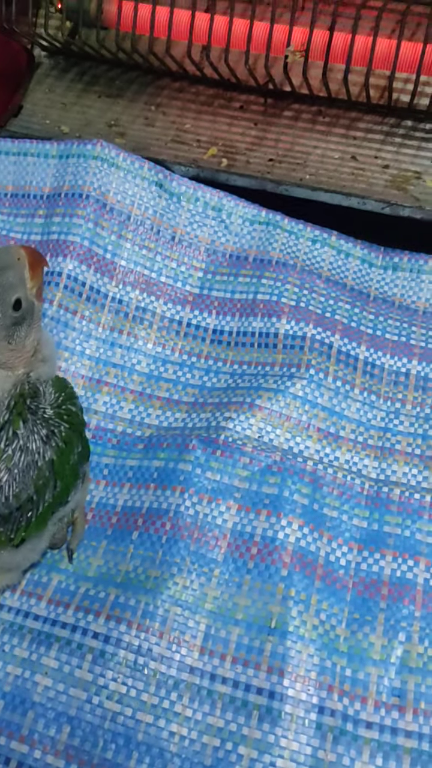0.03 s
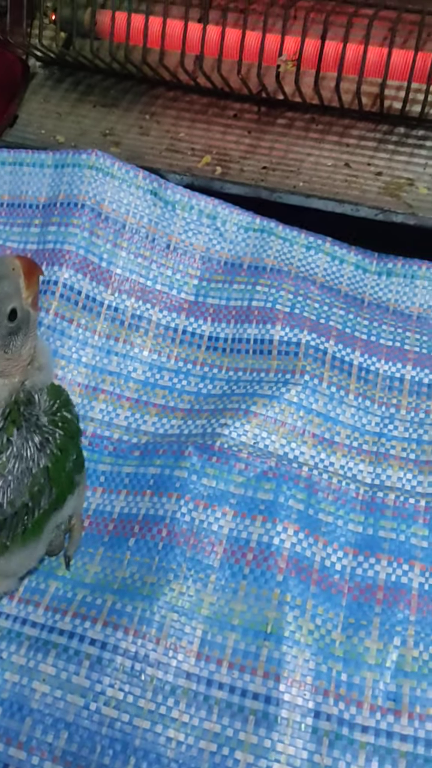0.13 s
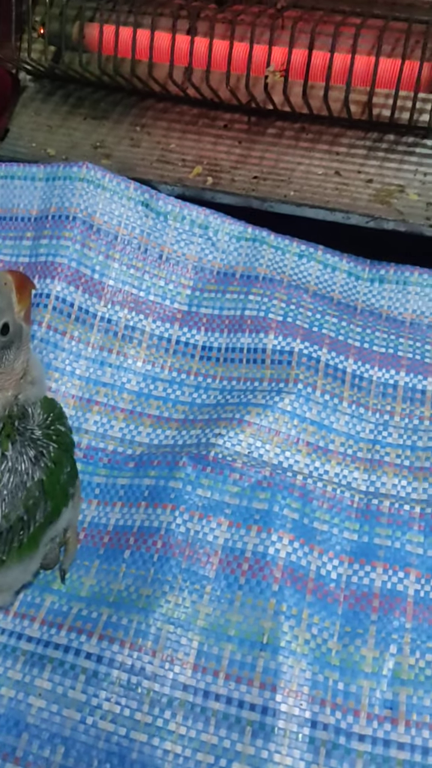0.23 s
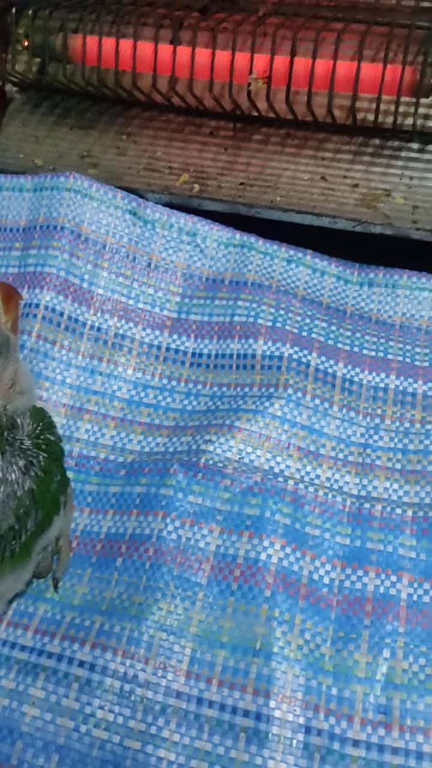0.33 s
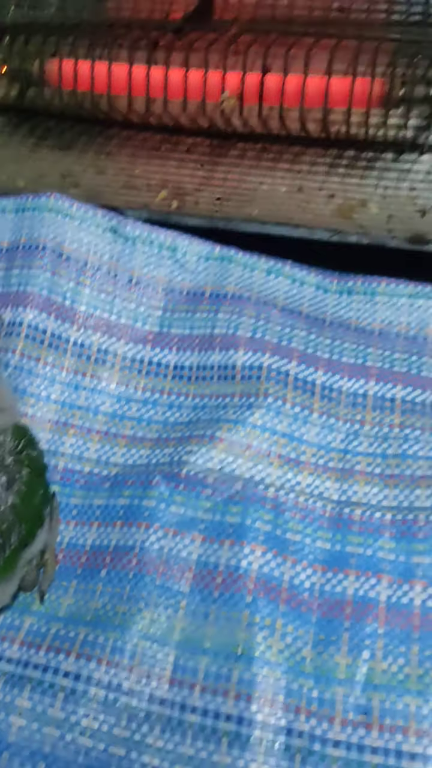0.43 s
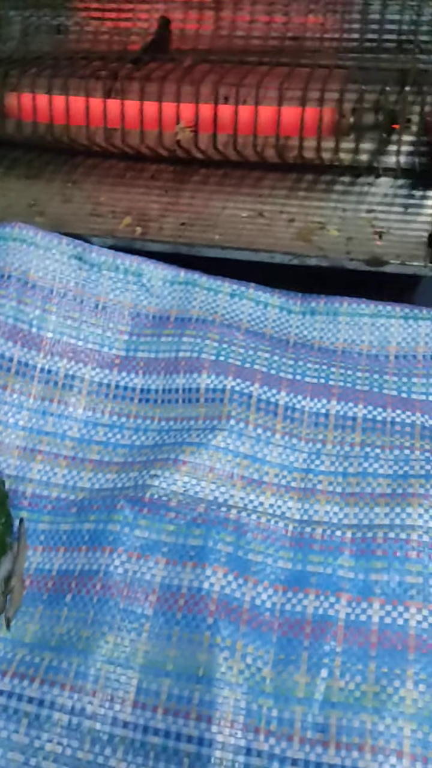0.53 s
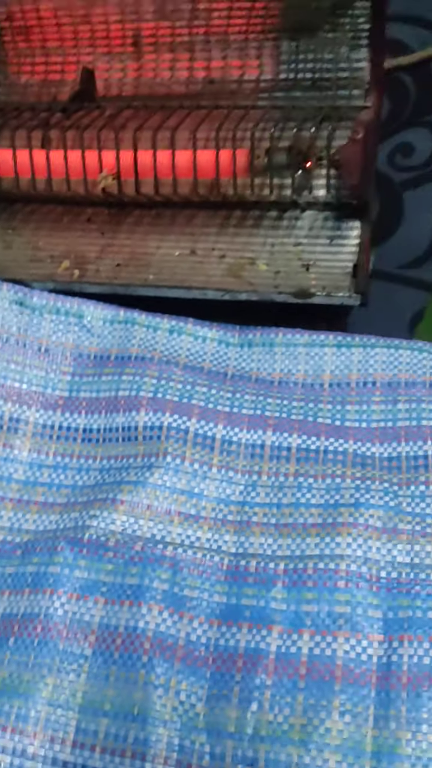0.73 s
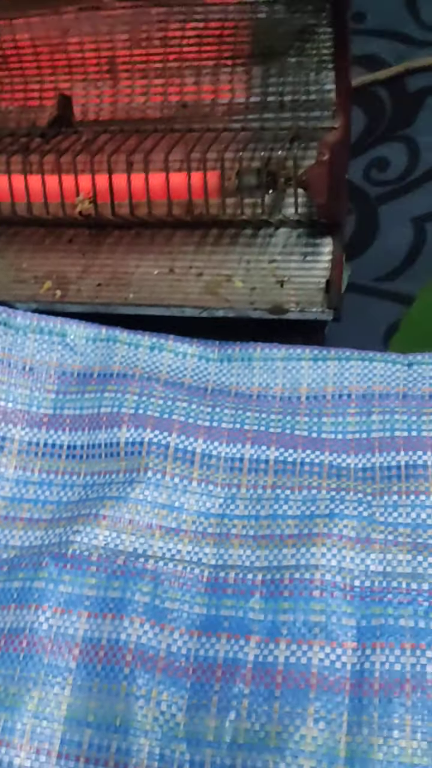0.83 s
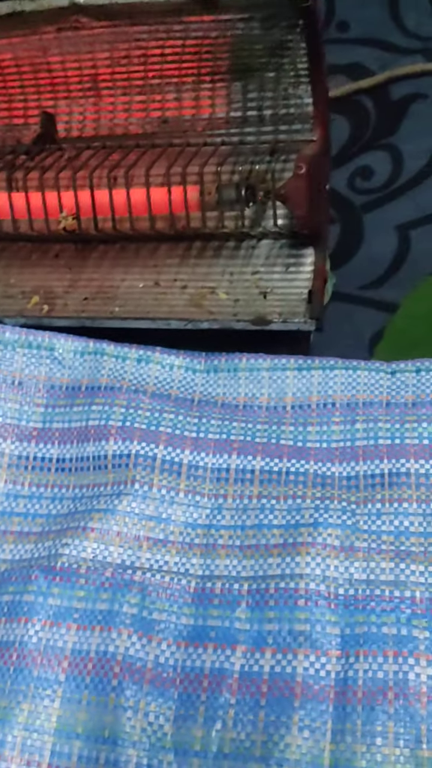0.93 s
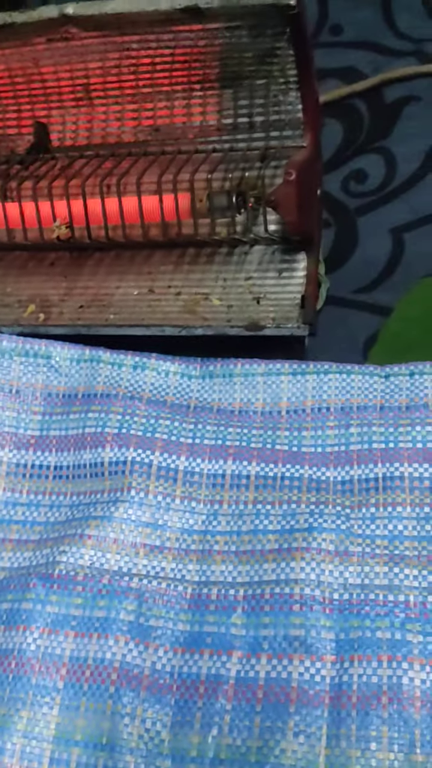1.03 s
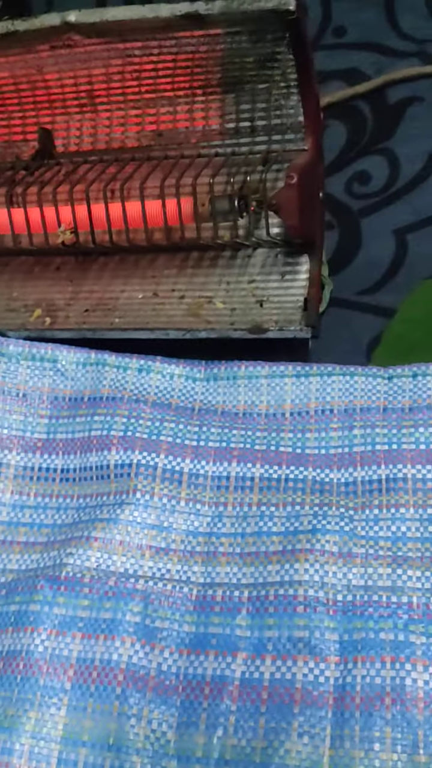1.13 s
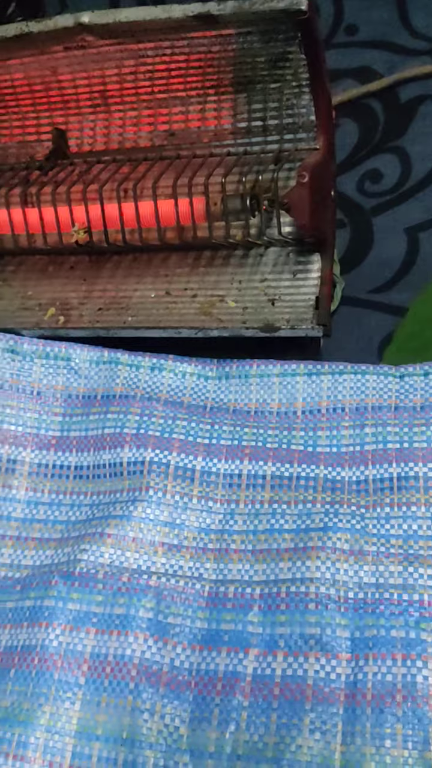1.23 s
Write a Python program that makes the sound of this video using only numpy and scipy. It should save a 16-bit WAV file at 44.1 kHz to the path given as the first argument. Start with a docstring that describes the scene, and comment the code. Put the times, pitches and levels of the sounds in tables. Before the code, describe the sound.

Single raspy parrot chick squawk, wheezing in and sinking to a buzzy end, then soft hiss.

```python
"""Parrot begging call

A young parrot begs once, close by in a small room. A squeak, then a wheeze with a faint beak click in
it just before the voice; a high nasal tone breaks into a long sinking rasp, rattles, and closes on a
loud buzzy note. Voice: jittered pulses through moving resonances, over a sine fundamental. Squeak:
gliding partials. Wheeze, click, hiss, rumble: coloured noise. After the call the hiss dips and swells."""
import sys
import numpy as np
from scipy import signal
from scipy.fft import rfft, irfft, next_fast_len
from scipy.io import wavfile
from scipy.ndimage import uniform_filter1d

SR = 44100
rng = np.random.default_rng(int(sys.argv[2]) if len(sys.argv) > 2 else 0)


def output_pcm(signal):
    """Save a mono or channel-first signal as 16-bit PCM at the path in sys.argv[1].

    Samples are clipped to [-1, 1] before scaling.
    """
    pcm = np.clip(np.atleast_2d(signal).T, -1, 1) * 32767
    wavfile.write(sys.argv[1], SR, np.round(pcm).astype(np.int16))


N = 57330
T = np.arange(N) / SR

# voice pitch: t/s, f/Hz
PITCH_HZ = [(.17, 1180), (.21, 1215), (.222, 1258), (.241, 1300), (.259, 1252), (.268, 1262), (.28, 1296),
            (.297, 1175), (.318, 1168), (.332, 970), (.352, 1015), (.39, 900), (.47, 900), (.53, 790),
            (.66, 750), (.735, 680), (.746, 650), (.764, 633), (.773, 638), (.781, 627), (.794, 595),
            (.803, 555), (.815, 500)]
# vocal effort: t/s, level/dB
EFFORT_DB = [(.14, -127), (.175, -35.5), (.205, -28), (.228, -21), (.27, -23.5), (.32, -21), (.37, -23.5),
             (.44, -21.5), (.53, -25.5), (.6, -23), (.67, -24), (.705, -21), (.736, -21), (.748, -18),
             (.785, -17.5), (.802, -21), (.812, -29.5), (.82, -52)]
# voice state: t/s, jitter/cycles, strong-weak depth/0-1, rattle depth/0-1
VOICE_STATE = [(.17, .2, .2, .1), (.205, .045, .4, .4), (.235, .012, .6, .5), (.28, .012, .6, .3),
               (.312, .038, .5, .35), (.345, .11, .3, .4), (.5, .17, .3, .52), (.66, .12, .3, .5),
               (.695, .12, .3, .85), (.735, .07, .4, .75), (.747, .01, .35, .25), (.775, .003, .2, .08),
               (.803, .003, .16, .06), (.815, .02, .2, .1)]
# fundamental relative to the pulsed voice: t/s, level/dB
FUNDAMENTAL_DB = [(.17, -17), (.215, -16), (.25, -15.5), (.32, -15), (.355, -15.5), (.4, -22), (.55, -23),
                  (.62, -17), (.72, -24), (.755, -17), (.79, -17), (.812, -12)]
# undertones, relative to the fundamental at full strong-weak depth: multiple of pitch/1, level/dB
UNDERTONE_PARTIALS = [(.5, -9), (.79, -7)]
# gain on all undertones: t/s, level/dB
UNDERTONE_GAIN_DB = [(.215, -24), (.24, 0), (.28, 0), (.3, -14), (.33, -60)]
# fixed colour of throat and beak: f/Hz, level/dB
THROAT_COLOUR = [(200, -30), (400, -17), (560, -9), (750, -7), (1100, -6), (1550, -5), (2000, -1.5),
                 (2400, 1), (3600, -2), (4300, -3), (5400, -3), (6400, -6), (7400, -5), (9500, -8),
                 (10600, -13), (11500, -24), (13500, -24), (15500, -44)]
# all-pass smear of each pulse in the airway: f/Hz, width/Hz
AIRWAY_SMEAR = [(2700, 2300), (3800, 220), (5600, 520), (7800, 5600), (8900, 1900)]
# moving throat resonances: t/s, lower f/Hz, lower level/dB, upper f/Hz, upper level/dB
THROAT_RESONANCES = [(.18, 2770, -9, 8700, 4), (.22, 3700, 8, 8880, 26), (.26, 3830, 14, 8980, 19),
                     (.3, 3530, 4, 9300, 9), (.37, 3600, 6, 9050, 11), (.44, 3620, 6, 8850, 14),
                     (.52, 3520, 2, 8600, 1.5), (.6, 3570, 1, 8000, 5), (.72, 3580, -2, 8400, 5),
                     (.755, 3500, -5, 8250, 13), (.78, 3500, -7, 8300, 16.5), (.805, 2400, -6, 8200, 13)]
# width of the upper resonance: t/s, width/Hz
UPPER_WIDTH_HZ = [(.27, 380), (.34, 750), (.7, 850), (.8, 800)]
# extra resonance of the closing note: t/s, level/dB
CLOSING_DB = [(.68, -25), (.74, -4), (.8, -2)]
# fixed notches: f/Hz, width/Hz, depth/0-1
FIXED_NOTCHES = [(4310, 1200, 0.38), (6400, 1130, 0.49)]
# throat hollow, depth per pass: t/s, depth/0-1
HOLLOW_DEPTH = [(.4, 0), (.55, 0), (.66, 0.55), (.72, 0.66), (.8, 0.39)]
# wheeze: t/s, level/dB
WHEEZE_DB = [(.04, -100), (.05, -58), (.062, -49), (.07, -44), (.086, -43), (.092, -38.5), (.14, -38.5),
             (.18, -38), (.23, -39), (.26, -80)]
# wheeze colour: f/Hz, left level/dB, right level/dB
WHEEZE_SPECTRUM = [(156, -25, -31), (690, -14.5, -12.5), (1186, -9.5, -21.5), (1224, -25, -19.5),
                   (1680, -8, -9.5), (2130, -15.5, -5), (2584, -1.5, -11), (3480, -23, -17.5),
                   (4130, -16, -21), (4250, -26, -14.5), (5360, -33, -19), (6330, -22, -8),
                   (7140, -28, -33), (8230, -22.5, -26), (10300, -53, -52), (14000, -94, -55)]
# squeak: t/s, f/Hz, level/dB
SQUEAK_GLIDE = [(.041, 2420, -62), (.044, 2240, -44), (.053, 2050, -42), (.059, 2020, -58)]
# squeak harmonics from the first up: level/dB
SQUEAK_HARMONICS_DB = [0, -15, -18, -27]
# colour of the room tail: f/Hz, level/dB
ROOM_SPECTRUM = [(300, -1), (2500, 0), (6000, -1), (9000, -4), (14000, -12)]
# extra room gain on the right: f/Hz, level/dB
RIGHT_ROOM_GAIN = [(300, 9), (2500, 12), (5000, 11), (7000, 11), (9000, 22), (14000, 20)]
# right side relative to left: f/Hz, level/dB
RIGHT_COLOUR = [(400, -7.5), (1500, -4.5), (3000, -9.5), (3700, -6.5), (4600, 2), (5600, 3.5), (6700, 3.5),
                (7400, 2), (8300, -35.5), (10000, -22.5), (14000, -17.5)]
# room hiss: t/s, level/dB
HISS_DB = [(0, -68), (.04, -68), (.15, -50), (.86, -53), (.93, -55.5), (1.02, -52), (1.11, -50), (1.3, -50)]
# gain on the hiss treble: t/s, level/dB
HISS_TREBLE_DB = [(0, -12), (.15, -35), (.88, -2.5), (1.0, -1.5), (1.15, 2.5), (1.3, 0.5)]
# hiss colour: f/Hz, left level/dB, right level/dB
HISS_SPECTRUM = [(103, -6, -16), (352, 9.5, 6), (810, 3.5, -1.5), (2260, 11.5, 7), (3400, 1.5, -1),
                 (4530, 2.5, 1), (5530, 0.5, 1), (6800, 5, 5.5), (9030, 9.5, -10), (10630, -8, -67),
                 (14600, -16.5, -98)]
# rumble: t/s, level/dB
RUMBLE_DB = [(0, -55.5), (.3, -53.5), (.7, -56), (1.0, -56), (1.2, -55.5), (1.3, -52.5)]
# rumble colour: f/Hz, left level/dB, right level/dB
RUMBLE_SPECTRUM = [(12.1, 2.5, 6), (27.7, 2, -14), (59, -3.5, -20), (104, -16, -16), (164, -8, -12.5),
                   (384, -14, -23.5), (785, -43, -44.5)]

PULSE_SPREAD_DB, AIR_PER_JITTER, AIR_SHARE = 20, 3, .09  # first two per cycle of jitter
STRONG_WEAK_SHARE, LIMP_CYCLES = .45, .06  # at full strong-weak depth
RATTLE_HZ, RATTLE_WANDER_SHARE, RATTLE_DB = 196.1, .184, 11.5
RATTLE_LOCK_CYCLES, RATTLE_UNLOCK_S = 4, .325
# at full roughness
WAVER_SHARE, FUNDAMENTAL_FLICKER_DB, FLUTTER_DB, FLUTTER_HZ = .06, 4.5, 1.3, 35
LOWER_WIDTH_HZ = 260
CLOSING_HZ, CLOSING_WIDTH_HZ = 5650, 450
HOLLOW_HZ, HOLLOW_WIDTH_HZ = 1764, 510
STREAK_LOW_HZ, STREAK_HIGH_HZ, STREAK_WIDTH_HZ = 1400, 9400, 170
STREAK_DB, STREAK_RATE_HZ, STREAK_WANDER_HZ = 3.5, 14, 60
CLICK_S, CLICK_DB, CLICK_DECAY_S = .154, -40, .003
ROOM_T60_S, ROOM_DB, ROOM_GAP_S = .15, -16, .003
RIGHT_LAG_S = .0002707
NOISE_LIKENESS = .43  # power share common to both sides
HISS_TREBLE_HZ = 7600
CUTOFF_HZ = 15600


def from_db(db):
    """Decibels to gain."""
    return 10 ** (np.asarray(db) / 20)


def rms_one(x):
    """Scale to unit rms."""
    return x / np.sqrt(np.mean(x ** 2) + 1e-20)


def in_time(rows):
    """Each column of a curve at every sample."""
    t_s, *columns = np.transpose(rows)
    return [np.interp(T, t_s, c) for c in columns]


def drift(rate_hz):
    """Low-passed noise, rms 1."""
    r = np.exp(-2 * np.pi * rate_hz / SR)
    noise = rng.standard_normal(2 * N)
    return rms_one(signal.lfilter([1], [1, -2 * r, r * r], noise)[N:])  # first half settles


def colour(x, points, axis=1):
    """Minimum-phase filter following one dB column of a spectrum, via the folded cepstrum."""
    size, p = 2 * next_fast_len(N), np.array(points)
    hz = np.maximum(np.arange(size // 2 + 1) * SR / size, 1)
    gain = from_db(np.interp(np.log(hz), np.log(p[:, 0]), p[:, axis]))
    cepstrum = irfft(np.log(gain))
    cepstrum[1:size // 2] *= 2
    cepstrum[size // 2 + 1:] = 0
    return irfft(rfft(x, size) * np.exp(rfft(cepstrum)))[:N]


def delay(x, seconds):
    """Fractional-sample delay by phase rotation."""
    turn = np.exp(-1j * np.pi * np.arange(N + 1) / N * seconds * SR)
    return irfft(rfft(x, 2 * N) * turn)[:N]


def pole_pair(hz, r):
    """Denominator of a two-pole resonator."""
    return [1, -2 * r * np.cos(2 * np.pi * hz / SR), r * r]


def resonate(x, hz, width_hz, size=64):
    """Resonance with moving centre and width, updated per block; peak gain 1."""
    radius = np.exp(-np.pi * width_hz / SR) * np.ones(N)
    out, state = np.zeros(N), np.zeros(2)
    for i in range(0, N, size):
        r = radius[i]
        zeros = np.array([1, 0, -1]) * (1 - r * r) / 2
        block = slice(i, i + size)
        out[block], state = signal.lfilter(zeros, pole_pair(hz[i], r), x[block], zi=state)
    return out


def stereo_noise(points):
    """Partly shared noise, coloured per side, shared part later on the right; rms 1."""
    shared, left, right = rng.standard_normal((3, N))
    a, b = np.sqrt(NOISE_LIKENESS), np.sqrt(1 - NOISE_LIKENESS)
    left = colour(a * shared + b * left, points, axis=1)
    right = colour(a * delay(shared, RIGHT_LAG_S) + b * right, points, axis=2)
    return rms_one(np.array([left, right]))


def call(size=600):
    """Syrinx pulses ring the throat; a sine fundamental sounds beneath; effort sets the level."""
    (hz,), (effort_db,), (tone_db,) = in_time(PITCH_HZ), in_time(EFFORT_DB), in_time(FUNDAMENTAL_DB)
    jitter, alternation, _ = in_time(VOICE_STATE)
    rough = jitter / jitter.max()
    cycles = np.cumsum(hz * (1 + WAVER_SHARE * rough * drift(91.5))) / SR
    x = throat(pulses(cycles), rough)
    x = x / np.sqrt(uniform_filter1d(x ** 2, size) + 1e-12)  # level the short-term rms
    partials = sum(from_db(db) * np.sin(2 * np.pi * k * cycles) for k, db in UNDERTONE_PARTIALS)
    under = alternation * from_db(in_time(UNDERTONE_GAIN_DB)[0]) * partials
    tone_gain = np.sqrt(2) * from_db(tone_db + FUNDAMENTAL_FLICKER_DB * rough * drift(52))
    tone = tone_gain * (np.sin(2 * np.pi * cycles) + under)
    level = from_db(effort_db + FLUTTER_DB * rough * drift(FLUTTER_HZ))
    return (x + tone) * level * (T > EFFORT_DB[0][0]) * (T < EFFORT_DB[-1][0])


def pulses(cycles, order=8):
    """One syrinx pulse per cycle: jittered, alternately strong and weak, bunched by a rattle; plus air."""
    jitter, alternation, rattle = in_time(VOICE_STATE)
    count = np.arange(1, int(cycles[-1]))
    at = np.interp(count, cycles, np.arange(N))
    i, chance = at.astype(int), rng.standard_normal((len(count), 2))
    swing = alternation[i] * (-1) ** count
    at = at + (jitter[i] * chance[:, 0] + LIMP_CYCLES * swing) * np.gradient(at)
    spread = from_db(PULSE_SPREAD_DB * jitter[i] * chance[:, 1])
    fine = np.zeros(N * order)  # oversampled for sub-sample timing
    fine[np.clip(np.round(at * order).astype(int), 0, N * order - 1)] = (
        (1 + STRONG_WEAK_SHARE * swing) * spread)
    train = rms_one(signal.resample_poly(fine, 1, order))
    air = (AIR_SHARE + AIR_PER_JITTER * jitter) * rng.standard_normal(N)
    free = np.cumsum(RATTLE_HZ * (1 + RATTLE_WANDER_SHARE * drift(82))) / SR
    # locked to the pitch until the voice breaks
    flap = np.where(T < RATTLE_UNLOCK_S, cycles / RATTLE_LOCK_CYCLES, free)
    return (train + air) * from_db(RATTLE_DB * rattle * np.cos(np.pi * flap) ** 4)


def throat(x, rough):
    """Fixed colour, smear, moving resonances, streaks, closing ring, then fixed notches and a hollow."""
    low_hz, low_db, high_hz, high_db = in_time(THROAT_RESONANCES)
    x = smear(colour(x, THROAT_COLOUR))
    low = from_db(low_db) * resonate(x, low_hz, LOWER_WIDTH_HZ)
    high = from_db(high_db) * resonate(x, high_hz, in_time(UPPER_WIDTH_HZ)[0])
    x = x + low + high
    closing = resonate(x, np.full(N, CLOSING_HZ), CLOSING_WIDTH_HZ)
    x = streaks(x, rough) + from_db(in_time(CLOSING_DB)[0]) * closing
    for notch_hz, width_hz, depth in FIXED_NOTCHES:
        x = x - depth * resonate(x, np.full(N, notch_hz), width_hz)
    for _ in range(2):
        x = x - in_time(HOLLOW_DEPTH)[0] * resonate(x, np.full(N, HOLLOW_HZ), HOLLOW_WIDTH_HZ)
    return x


def smear(x):
    """All-pass ringing spreads each pulse in time, spectrum unchanged."""
    for hz, width_hz in AIRWAY_SMEAR:
        poles = pole_pair(hz, np.exp(-np.pi * width_hz / SR))
        x = signal.lfilter(poles[::-1], poles, x)
    return x


def streaks(x, rough, count=18):
    """Narrow resonances swell, fade and wander independently, most in the rasp."""
    for hz in np.linspace(STREAK_LOW_HZ, STREAK_HIGH_HZ, count):
        centre_hz = hz + STREAK_WANDER_HZ * drift(STREAK_RATE_HZ)
        band = resonate(x, centre_hz, STREAK_WIDTH_HZ, size=128)
        swell = np.clip(drift(STREAK_RATE_HZ), -2, 2)
        x = x + (from_db(STREAK_DB * np.sqrt(rough) * swell) - 1) * band
    return x


def wheeze():
    """Air noise through the throat, from before the voice catches into its opening."""
    return from_db(in_time(WHEEZE_DB)[0]) * stereo_noise(WHEEZE_SPECTRUM)


def squeak():
    """Tiny falling whistle as the airway opens: harmonics on a gliding pitch."""
    hz, db = in_time(SQUEAK_GLIDE)
    phase = 2 * np.pi * np.cumsum(hz) / SR
    tone = sum(from_db(d) * np.sin((k + 1) * phase) for k, d in enumerate(SQUEAK_HARMONICS_DB))
    return tone * from_db(db) * (T > SQUEAK_GLIDE[0][0]) * (T < SQUEAK_GLIDE[-1][0])


def click():
    """Faint beak tick in the wheeze: throat-coloured noise, decaying exponentially."""
    fall = np.exp(-np.maximum(T - CLICK_S, 0) / CLICK_DECAY_S) * (T > CLICK_S)
    return from_db(CLICK_DB) * fall * rms_one(colour(rng.standard_normal(N), THROAT_COLOUR))


def room(x):
    """Short diffuse tail: convolution with decaying noise, independent per side."""
    tails = rng.standard_normal((2, N)) * from_db(-60 * T / ROOM_T60_S) * (T > ROOM_GAP_S)
    x = colour(x, ROOM_SPECTRUM)
    wet = [signal.fftconvolve(x, h / np.sqrt(np.sum(h ** 2)))[:N] for h in tails]
    return from_db(ROOM_DB) * np.array(wet)


def background():
    """Soft coloured-noise hiss with moving level and treble, over a low rumble."""
    hiss = stereo_noise(HISS_SPECTRUM)
    lowpass = signal.butter(2, HISS_TREBLE_HZ, fs=SR, output="sos")
    dull = signal.sosfiltfilt(lowpass, hiss)
    hiss = dull + from_db(in_time(HISS_TREBLE_DB)[0]) * (hiss - dull)
    rumble = from_db(in_time(RUMBLE_DB)[0]) * stereo_noise(RUMBLE_SPECTRUM)
    return from_db(in_time(HISS_DB)[0]) * hiss + rumble


def scene():
    """Bird to the left: the right side hears it later, recoloured and with more room."""
    bird = call() + squeak() + click()
    left_room, right_room = room(bird)
    right = delay(bird, RIGHT_LAG_S) + colour(right_room, RIGHT_ROOM_GAIN)
    return np.array([bird + left_room, colour(right, RIGHT_COLOUR)]) + wheeze() + background()


def record(dry):
    """Steep low-pass, 70 dB down from the cutoff up."""
    return signal.sosfilt(signal.cheby2(14, 70, CUTOFF_HZ, fs=SR, output="sos"), dry)


dry = scene()
out = record(dry)
output_pcm(out)
```